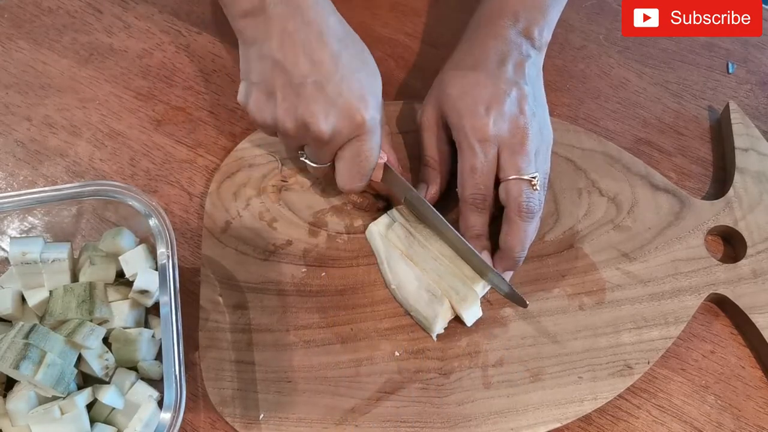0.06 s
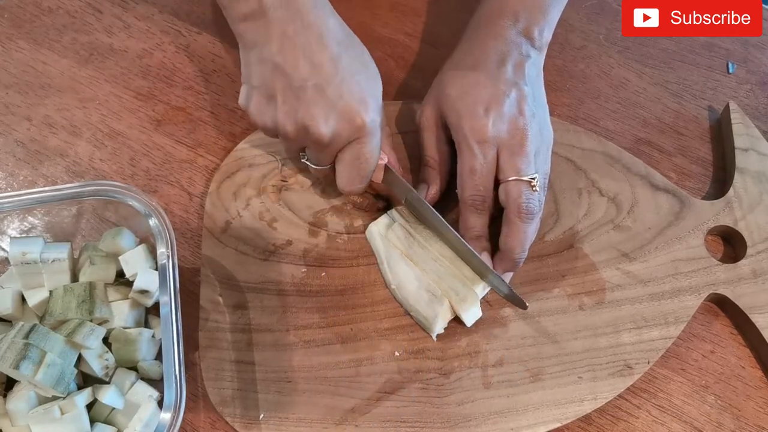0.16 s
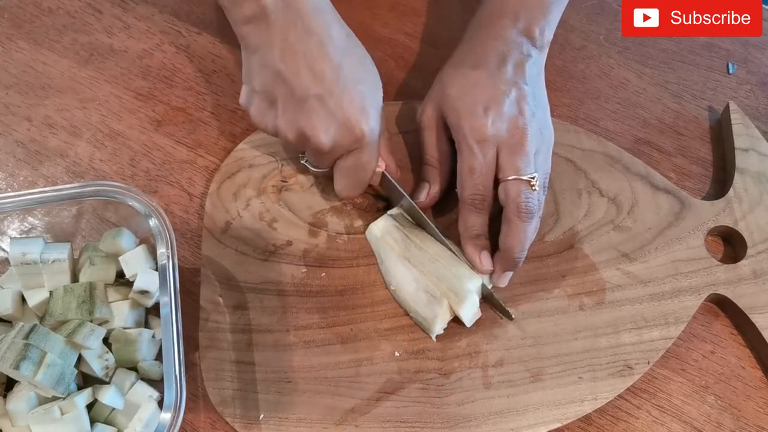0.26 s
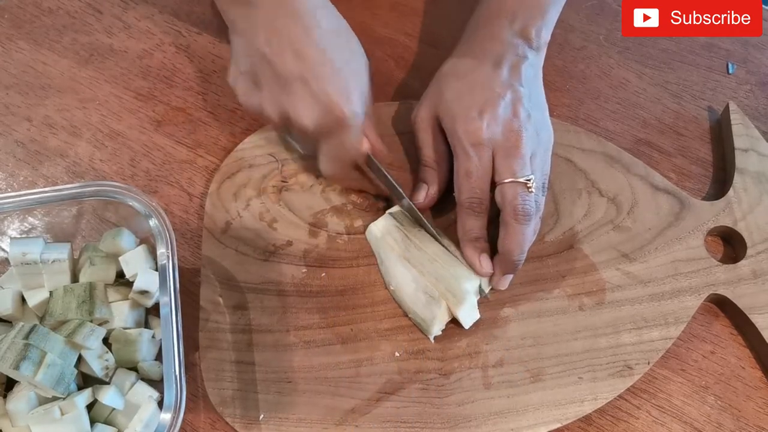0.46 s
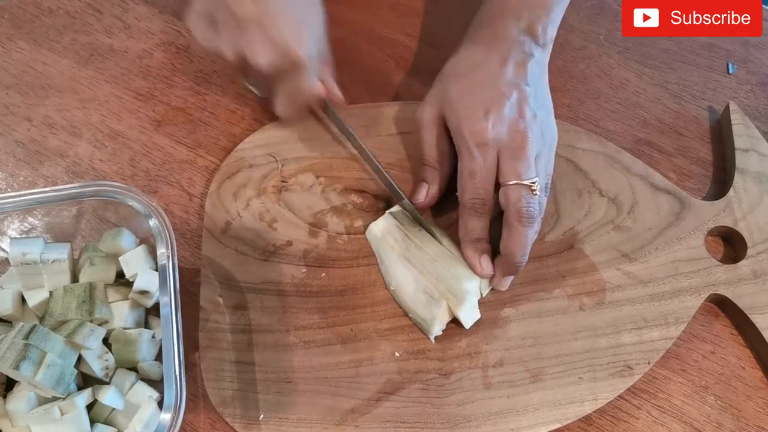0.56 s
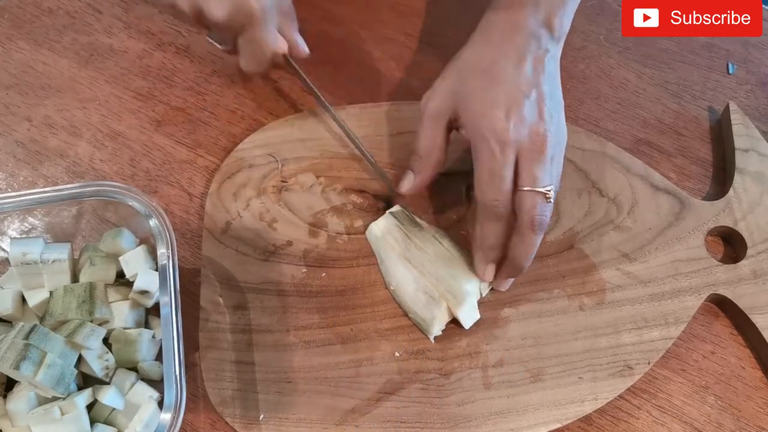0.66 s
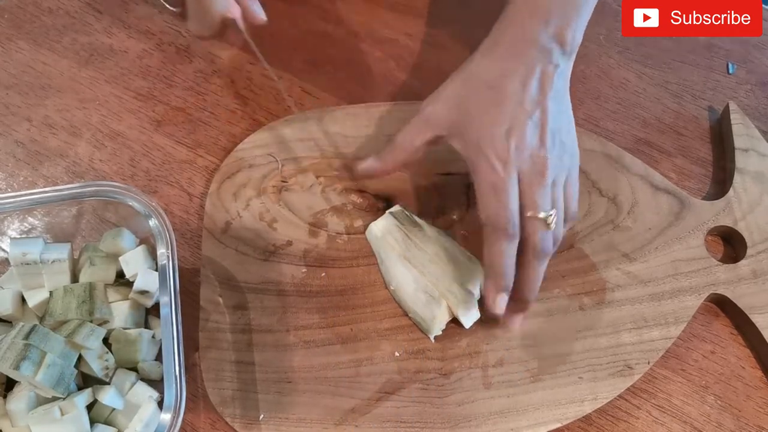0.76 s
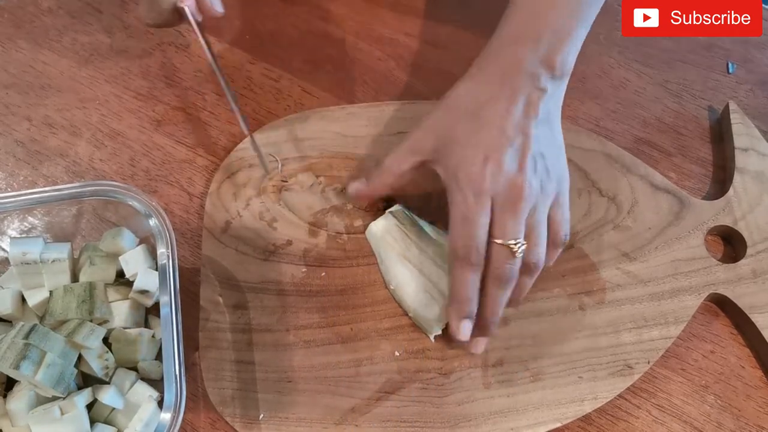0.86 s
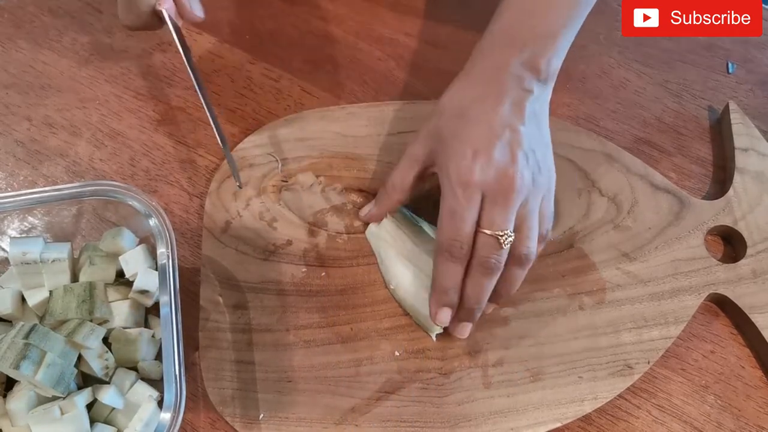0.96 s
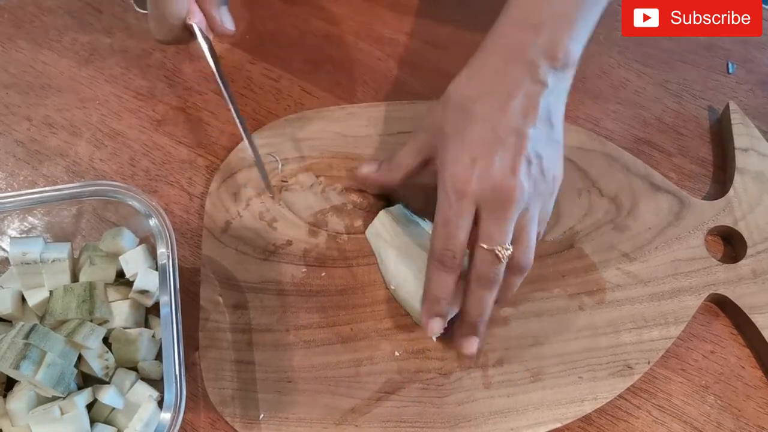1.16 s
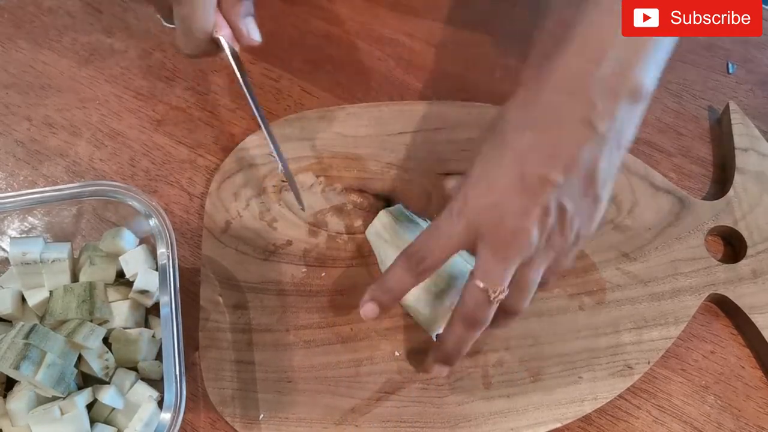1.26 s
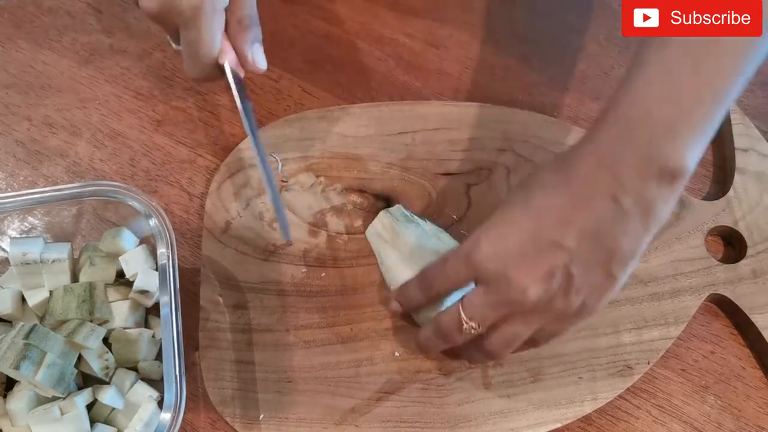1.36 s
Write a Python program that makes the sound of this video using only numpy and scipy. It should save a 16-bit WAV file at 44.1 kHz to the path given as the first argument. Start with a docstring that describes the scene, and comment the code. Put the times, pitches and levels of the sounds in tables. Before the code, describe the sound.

One crisp knife chop onto a wooden board, then a faint scrape of the blade.

```python
"""Over a faint hum and rumble, a blade nicks the skin of a vegetable with a soft, wet hiss.
Cells burst in a crunch as it cuts through; the edge knocks on the wooden board, whose modes ring,
and the load on the board sets the table booming. The edge is then drawn back across the wood,
slipping and catching, and fingers turn the piece. The hard kitchen walls reverberate."""
import sys
import numpy as np
from scipy import signal
from scipy.fft import rfft, irfft
from scipy.io import wavfile
from scipy.ndimage import uniform_filter1d, minimum_filter1d

SR = 44100
rng = np.random.default_rng(int(sys.argv[2]) if len(sys.argv) > 2 else 0)


def master(y):
    """Save y as 16-bit WAV."""
    cut = np.clip(np.atleast_2d(y).T, -1, 1)
    pcm = np.round(cut * 32767)  # scale
    wavfile.write(sys.argv[1], SR, pcm.astype(np.int16))


N = 61739


def from_db(db):
    """Amplitude ratio of a level in decibels."""
    return 10 ** (np.asarray(db) / 20)


def rms_one(x):
    """Normalisation to unit rms."""
    return x / np.sqrt(np.mean(x ** 2) + 1e-20)


def at_hz(points, hz):
    """Interpolation of a table on a logarithmic frequency axis."""
    f, value = np.transpose(points)
    return np.interp(np.log(np.maximum(hz, 1)), np.log(f), value)


def colour(x, spectrum):
    """Zero-phase filtering by a spectrum, falling 12 dB per octave below its lowest point."""
    hz = np.arange(N + 1) * SR / (2 * N)
    gain = from_db(at_hz(spectrum, hz)) * np.minimum(hz / spectrum[0][0], 1) ** 2
    return irfft(rfft(x, 2 * N) * gain)[..., :N]


def pan(right_db):
    """Level difference: the right channel gains what the left loses."""
    return from_db(np.array([[-1], [1]]) * right_db)


def pair(two, correlation):
    """Partial coherence: sum and difference of two independent signals give left and right."""
    mid = np.sqrt((1 + correlation) / 2) * two[0]
    side = np.sqrt((1 - correlation) / 2) * two[1]
    return mid + side * np.array([[1], [-1]])


def delay(x, s):
    """Propagation delay of s seconds."""
    return np.interp(np.arange(N) - s * SR, np.arange(N), x, left=0)


def strike(blows, modes, soft_hz):
    """Modal response: impulses, low-passed by a soft contact, excite damped resonators."""
    impulses, ringing = np.full(N, 1e-18), 0
    for s, db in blows:
        impulses[int(s * SR)] += from_db(db)
    force = signal.sosfilt(signal.butter(2, soft_hz, fs=SR, output="sos"), impulses)
    for hz, db, t60 in modes:
        radius = 1000 ** (-1 / (t60 * SR))
        pole_real = radius * np.cos(2 * np.pi * hz / SR)
        mode = signal.lfilter([1, -pole_real], [1, -2 * pole_real, radius ** 2], force)
        ringing = ringing - from_db(db) * mode
    return ringing


def grains(per_s, spread_db):
    """Shot noise: two independent streams of randomly timed impulses."""
    sizes = from_db(spread_db * np.minimum(rng.exponential(1, (2, N)), 4))
    return sizes * rng.choice([-1, 1], (2, N)) * (rng.random((2, N)) < per_s / SR)


def strokes(rows, attack_s, release_s):
    """Envelope of linear rises, holds and exponential decays; the strongest stroke prevails."""
    t, envelope = np.arange(N) / SR, 0
    for start, hold, db in rows:
        rise = np.clip((t - start) / attack_s, 0, 1)
        decay = np.exp(-np.maximum(t - start - hold - attack_s, 0) / release_s)
        envelope = np.maximum(envelope, from_db(db) * rise * decay)
    return envelope


def background():
    """Broadband noise and a hum modulated in amplitude and phase, reaching the left side first."""
    # ambient noise spectrum: f/Hz, level/dB
    air_spectrum = [(20, -7.5), (32, -7.5), (50, -15), (80, -16.5), (126, -15.5), (202, -20.5), (320, -21),
                    (450, -23), (630, -23), (850, -25.5), (1340, -27.5), (2300, -29.5), (2800, -31.5),
                    (3500, -37), (6000, -44), (10000, -48.5), (15500, -52.5)]
    # mains and motor tones: f/Hz, level/dB
    hum_tones = [(199, -67.5), (392, -73.5), (457, -69), (585, -77), (640, -70), (963, -71.5)]
    t, knot_times = np.arange(N) / SR, np.linspace(0, (N - 1) / SR, 14)
    noise = pair(rng.standard_normal((2, N)), correlation=0.41)
    ambient = from_db(-56) * rms_one(colour(noise, air_spectrum))
    for hz, db in hum_tones:
        swell, wander = [0.42 * np.interp(t, knot_times, k) for k in rng.standard_normal((2, 14))]
        tone = np.sqrt(2) * np.sin(2 * np.pi * hz * t + 2 * wander)
        ambient += from_db(db) * (1 + swell) * tone
    return np.array([ambient[0], delay(ambient[1], s=0.00045)]) * pan(right_db=0.48)


def bumps():
    """Forced vibration: the working hands rock the table, a low rumble alike on both sides."""
    # shifts of weight: t/s, hold/s, level/dB
    shifts = [(0.0, 0.16, -53.5), (0.63, .07, -56), (0.835, .03, -57), (0.9, 0.079, -54.5),
              (1.08, 0.11, -55.5), (1.35, 0.051, -54)]
    # rumble spectrum: f/Hz, level/dB
    spectrum = [(22, -5.5), (31, -2.5), (48, -17.5), (70, -5.5), (130, -14.5), (300, -27.5), (2000, -84)]
    rumble = rms_one(colour(rng.standard_normal(N), spectrum))
    return rumble * strokes(shifts, attack_s=0.0093, release_s=0.0069)


def rub():
    """Friction noise: wet flesh slides under the fingers and along the steel, which resonates."""
    # sliding movements: t/s, rise/s, hold/s, release/s, level/dB
    slides = [(-0.03, 0.022, 0.033, 0.16, -58.5), (0.415, .06, 0.13, 0.0093, -56.5),
              (0.962, 0.031, .005, 0.048, -68), (1.13, 0.024, .02, .03, -73)]
    # blade resonances: f/Hz, bandwidth/Hz, level/dB relative to the hiss
    blade_modes = [(3150, 130, 5), (4700, 160, 8), (5100, 130, -0.5), (6680, 152, 4), (8540, 270, -2)]
    # friction spectrum: f/Hz, level/dB
    spectrum = [(500, 7), (2500, 1.5), (3800, -7.5), (4800, -6.5), (5700, 0), (6800, -7), (8700, -2.5),
                (12000, -5), (15000, -10.5)]
    slips = pair(grains(per_s=2300, spread_db=0.5), correlation=0.12)
    ringing = sum(from_db(db) * signal.lfilter(*signal.iirpeak(hz, hz / width, fs=SR), slips)
                  for hz, width, db in blade_modes)
    pressure = sum(strokes([(s, hold, db)], rise, release) for s, rise, hold, release, db in slides)
    return rms_one(colour(slips + ringing, spectrum)) * pressure * pan(right_db=1)


def thump():
    """Structure-borne sound: the blade's load passes through the board to the table's low modes."""
    # pushes of the board on the table: t/s, level/dB
    pushes = [(0.004, -13.5), (0.2205, 2.5), (0.2385, -10.5)]
    # table modes: f/Hz, level/dB, T60/s
    table_modes = [(35, -48, .3), (70, -49.5, 0.48), (114, -46, 0.53), (136.3, -32, 0.597),
                   (199.6, -45.5, 1), (232.4, -44.5, 0.78), (276, -53.5, .4)]
    return strike(pushes, table_modes, soft_hz=242)


def crunch():
    """Acoustic emission from fracture: plant cells burst in quick succession under the blade."""
    # spells of bursting: t/s, hold/s, level/dB
    fractures = [(0.0095, 0.0026, -52), (0.205, .005, -53), (0.211, .004, -40), (0.215, 0.0057, -32),
                 (0.224, 0.0036, -42), (0.230, 0.0089, -38.5)]
    # spectrum of a burst: f/Hz, level/dB
    spectrum = [(600, -8.5), (780, -4), (1500, -7), (2200, -13.5), (3800, -10.5), (4800, -11.5),
                (7000, -13), (10300, -13), (15000, -23.5)]
    bursts = pair(grains(per_s=9000, spread_db=1.5), correlation=0.55)
    envelope = strokes(fractures, attack_s=0.003, release_s=0.00067)
    return rms_one(colour(bursts, spectrum)) * envelope * pan(right_db=1.4)


def board(contacts, low_hz=550, high_hz=3280):
    """Free vibration of the struck board and blade, limited to the band that the board radiates."""
    # modes of board and blade: f/Hz, level/dB, T60/s
    modes = [(648, -13, 0.0033), (1727, -3, 0.0078), (2020, -2.5, 0.0071), (2670, -8.5, 0.01014)]
    ringing = strike(contacts, modes, soft_hz=4000)
    ringing = signal.sosfilt(signal.butter(2, low_hz, "high", fs=SR, output="sos"), ringing)
    return signal.sosfilt(signal.butter(8, high_hz, fs=SR, output="sos"), ringing)


def knock():
    """Impact sound with early reflections: the edge hits the board and later catches on it."""
    # the edge lands twice, a sharp first tap, then a louder, duller knock
    # made of two merged impulses: t/s, level/dB
    landings = [(0.23781, -5.4), (0.23864, 0), (0.2388, 0)]
    # the edge catches in the wood and skips free: t/s, level/dB
    catches = [(0.5343, -45), (0.5552, -60), (0.5577, -53)]
    # reflections from near surfaces: delay/s, left gain, right gain
    echoes = [(.0037, -0.12, 0.26), (.0088, 0.12, 0.05), (0.0172, .09, .04), (.0195, .03, .09)]
    hit = from_db(-0.34) * board(landings) + board(catches)
    direct = np.array([delay(hit, s=0.00003), hit]) * pan(right_db=1)
    return direct + sum(delay(hit, s) * np.array([[left], [right]]) for s, left, right in echoes)


def drag():
    """Stick-slip friction: small slips of the returning edge excite the board's resonances."""
    # scrapes across the wood: t/s, hold/s, level/dB
    scrapes = [(0.512, 0.01, -45), (0.531, 0.024, -44), (0.5525, 0.0053, -38.5), (0.566, 0.036, -44.5),
               (0.615, 0.023, -52)]
    # response of the scraped board: f/Hz, level/dB
    spectrum = [(300, -18), (570, -45), (680, -18), (830, -6.5), (1060, -24.5), (1350, -7), (1700, -5),
                (1960, -0.5), (2250, -7.5), (2900, -23.5), (4000, -27.5), (12000, -52)]
    slips = pair(grains(per_s=9000, spread_db=0), correlation=0.69)
    envelope = strokes(scrapes, attack_s=0.0015, release_s=0.011)
    return rms_one(colour(slips, spectrum)) * envelope * pan(right_db=0.7)


def kitchen(x, build_s=0.0017):
    """Reverberation: a diffuse field decays exponentially in each band, fastest in the top treble."""
    # reverberation times: f/Hz, T60/s
    decay_times = [(150, 0.97), (600, 0.78), (2000, 0.71), (5000, 0.97), (14000, 0.3)]
    # colour of the diffuse field: f/Hz, level/dB
    spectrum = [(100, 1.5), (270, -3.5), (420, -9.5), (590, 1.5), (800, -9.5), (1100, -13), (1700, -14),
                (2150, -15.5), (2650, -8), (3150, -9.5), (3700, -9.5), (5000, -6.5), (9000, -13.5),
                (15000, -12)]
    t, hz = np.arange(N) / SR, np.arange(N // 2 + 1) * SR / N
    white = rfft(pair(rng.standard_normal((2, N)), correlation=0.19))
    build_up = 1 - np.exp(-t / build_s)
    edges_hz, tail = np.geomspace(60, 18000, 13), 0
    for low, high in zip(edges_hz, edges_hz[1:]):
        band = irfft(white * ((hz >= low) & (hz < high)), N)
        t60 = at_hz(decay_times, np.sqrt(low * high))
        envelope = build_up * 1000 ** (-t / t60)
        tail = tail + band * envelope / np.linalg.norm(envelope)
    wet = signal.fftconvolve(x.mean(axis=0)[None], colour(tail, spectrum), axes=1)[:, :N]
    return wet * from_db(2.5) * pan(right_db=0.8)


def scene():
    """Superposition of the cut, its reverberation, the table's vibration and the background."""
    cut = knock() + crunch() + rub() + drag()
    return cut + kitchen(cut) + thump() + background() + bumps()


def record(dry, ceiling=0.97, limiter_s=0.0015, cutoff_hz=16000):
    """Transduction: each microphone port colours the sound; a peak limiter and steep low-pass follow."""
    # responses of the two ports: f/Hz, level/dB
    left_port = [(10, 5.4), (200, -3), (700, -1.5), (2400, 0.5), (3600, 3), (4500, 1.5), (5600, 1),
                 (7600, 1), (8800, 2.5), (10200, -6), (13500, -3.5), (15500, -11.5)]
    right_port = [(10, 5), (200, -5.5), (700, 1.5), (2300, 3), (3900, 1), (5600, 0), (6800, 2), (8500, -1),
                  (10700, 4), (14200, -1), (15300, 5)]
    heard = np.array([colour(dry[0], left_port), colour(dry[1], right_port)])
    window = int(limiter_s * SR)
    safe_gain = ceiling / np.maximum(np.abs(heard).max(axis=0), ceiling)
    smooth_gain = uniform_filter1d(minimum_filter1d(safe_gain, window), window)
    return signal.sosfiltfilt(signal.butter(20, cutoff_hz, fs=SR, output="sos"), heard * smooth_gain)


dry = scene()
out = record(dry)
master(out)
```